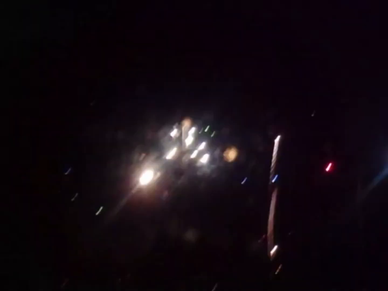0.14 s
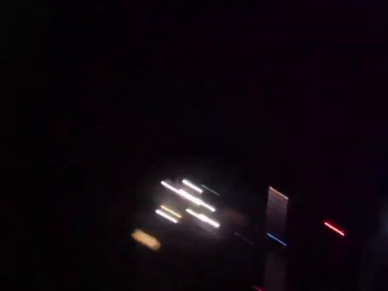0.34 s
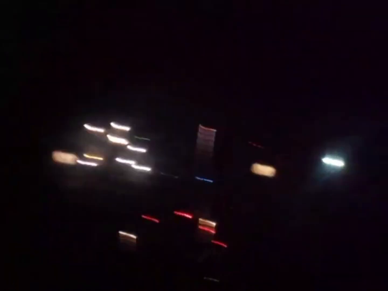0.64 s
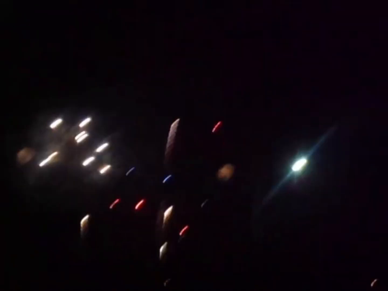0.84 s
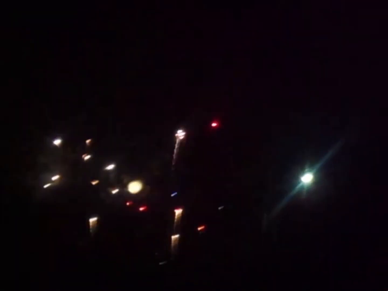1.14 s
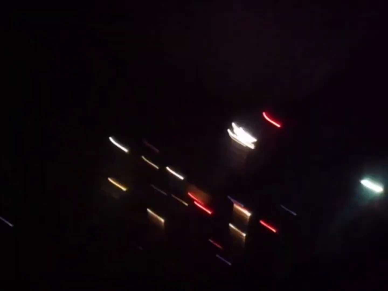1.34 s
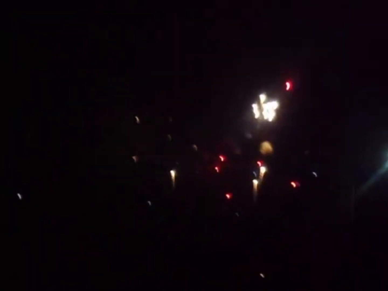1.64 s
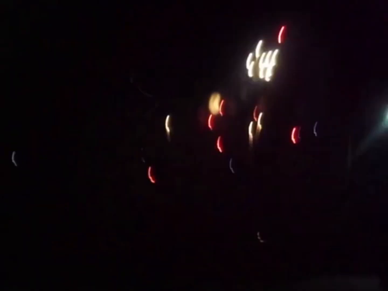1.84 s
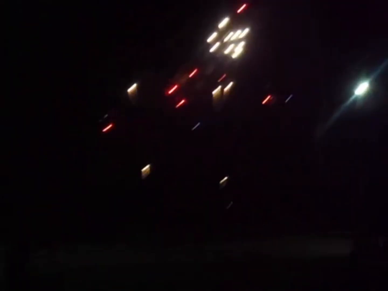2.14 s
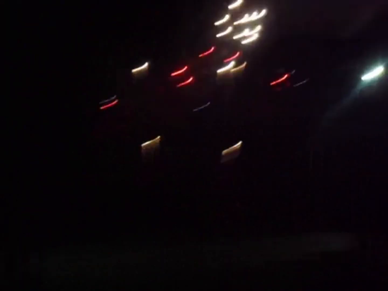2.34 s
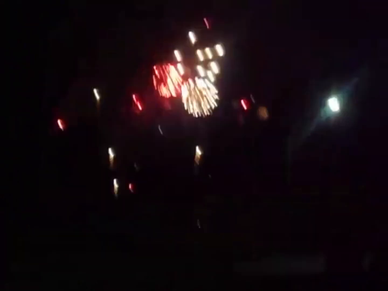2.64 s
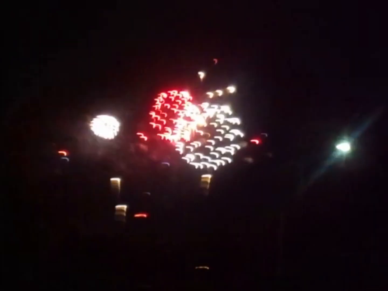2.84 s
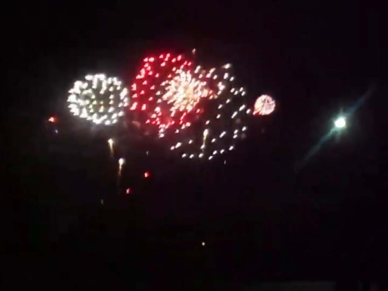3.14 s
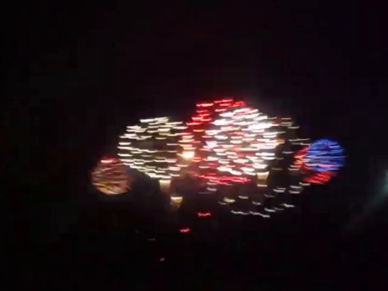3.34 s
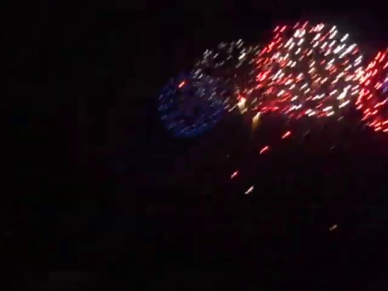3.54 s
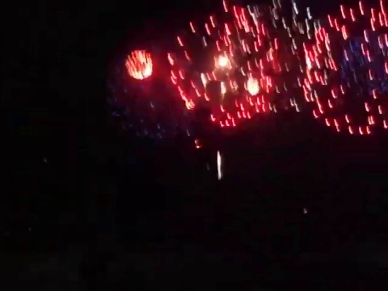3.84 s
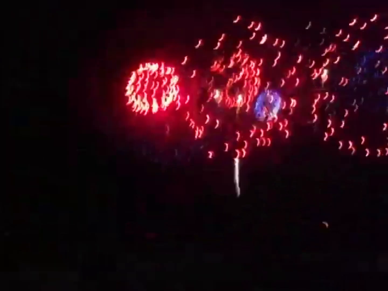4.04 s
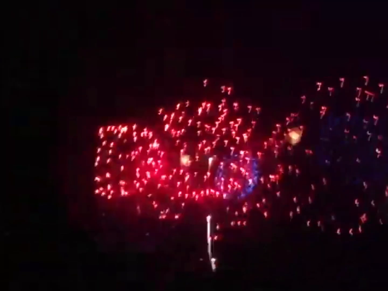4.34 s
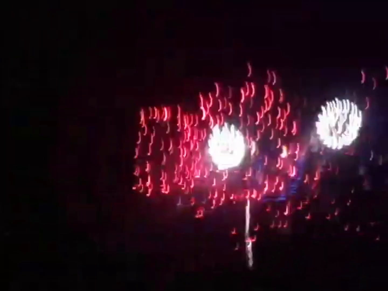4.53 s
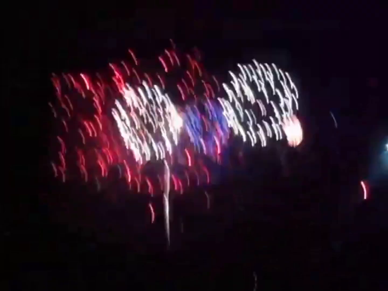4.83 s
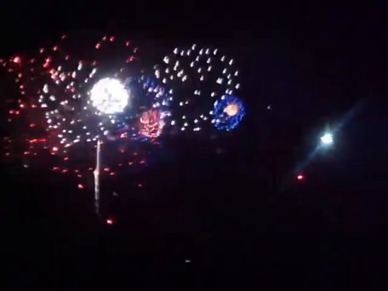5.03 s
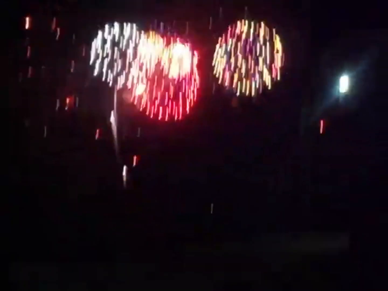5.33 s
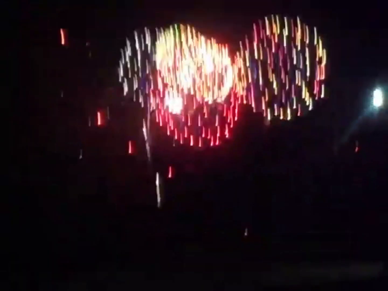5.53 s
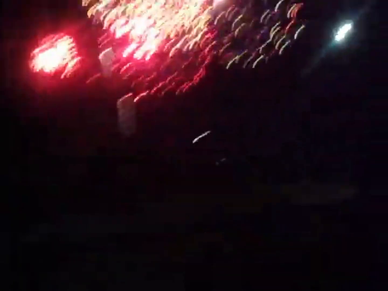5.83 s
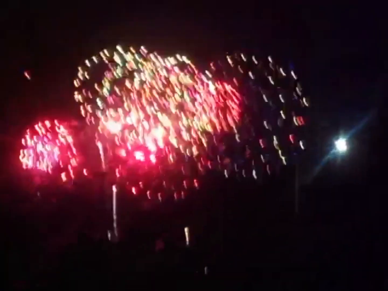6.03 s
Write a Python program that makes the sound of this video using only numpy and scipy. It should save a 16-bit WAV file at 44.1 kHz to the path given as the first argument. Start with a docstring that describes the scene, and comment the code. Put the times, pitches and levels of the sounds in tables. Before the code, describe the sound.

Outdoors, a few sharp firework bangs and scattered little pops open over a soft, far-off rumble. Soon the barrage thickens: louder cracks with deep thumps land at uneven intervals, several a second, their echoes rolling together while light crackling carries on. The bursts keep coming throughout. It is all heard from the ground through a phone that loses the high end and overloads slightly on the hardest bangs.

```python
"""Fireworks over open ground at night, heard through a phone that passes little treble.
From the start, shells burst overhead and small stars pop over the rumble of far-off fireworks.
Each burst is a sharp crack, doubled by the ground, on a low thump of air; echoes roll after it.
From 1.7 s the thumps are heavier and the loudest cracks overload the phone.
The shells keep coming in quick succession, the last at 6 s."""
import sys
import numpy as np
from scipy import signal
from scipy.io import wavfile
from scipy.ndimage import uniform_filter1d

SR = 44100
rng = np.random.default_rng(int(sys.argv[2]) if len(sys.argv) > 2 else 0)


def put_to_file(sound):
    """Save the sound as 16-bit audio at rate SR, in the file named by the first command-line argument."""
    columns = np.atleast_2d(sound).T  # one column per channel
    safe = np.clip(columns, -1, 1)
    whole_steps = np.round(safe * 32767)
    wavfile.write(sys.argv[1], SR, whole_steps.astype(np.int16))


N = 272538

# One row per shell. The bite is a ring above the crack's pitch; the sizzle is the treble on top.
# (time [s], crack level [dB], crack pitch [Hz], bite level [dB], bite pitch [Hz],
#  thump level [dB], thump pitch [Hz], sizzle level [dB]); levels are relative
SHELL_BURSTS = [(0.0721, -6.5, 875, -7, 1105, -25, 154, -24.5),
                (0.2649, -13, 856, -18.5, 1140, -19.5, 268, -23.5),
                (0.5783, -12, 830, -17, 1310, -18.5, 185, -32),
                (0.6366, -6.5, 860, -8, 1104, -15.5, 214, -19),
                (1.1154, -22.5, 1040, -25, 1280, -19, 161, -31),
                (1.2081, -19.5, 730, -13.5, 1260, -16, 204, -23.5),
                (1.6982, -2, 895, -1.5, 1270, -7, 120.4, -11.5),
                (2.0124, -8.5, 600, -10.5, 1120, -7, 122, -26),
                (2.0251, -22.5, 1020, -17, 1510, -10, 126, -44),
                (2.0495, -39, 860, -3.5, 1295, -7.5, 137, -14),
                (2.0996, -13, 603, -17, 1480, -7.5, 131, -21),
                (2.4554, -15, 880, -16, 1180, -16, 205, -32.5),
                (2.542, -5, 920, -10, 1130, -10.5, 136, -13.5),
                (2.5626, -16, 620, -20, 1490, -6.5, 119, -16),
                (2.6274, -7, 920, -12, 1270, -8.5, 123, -16.5),
                (2.9968, -4, 980, -18.5, 1220, -8.5, 129, -18),
                (3.0849, -7.5, 1030, -13.5, 1160, -11.5, 125.5, -18),
                (3.2723, -24.5, 805, -12, 1180, -13, 120.4, -24),
                (3.482, -11.5, 960, -0.5, 1314, -7.5, 120.5, -18),
                (3.6776, -5.5, 862, -10.5, 1350, -5.5, 132.3, -19.5),
                (3.9803, -9.5, 980, -22.5, 1210, -17.5, 185, -27),
                (4.0942, -2, 936, -5.5, 1237, -8.5, 124, -11), (4.4189, -5, 694, -5.5, 1083, -6, 129, -9),
                (4.8188, -1, 747, -5, 1167, -5.5, 118, -18),
                (5.3911, -4.5, 780, -6, 1156, -8.5, 121, -14.5),
                (5.5397, -10.5, 840, -10, 1270, -8.5, 137.5, -16),
                (5.7953, -11, 803, -11.5, 1160, -8, 109, -18.5),
                (5.8302, -13, 853, -15, 1230, -14, 203, -21.5),
                (6.0202, -7.5, 773, -10, 1230, -10, 165.5, -13.5)]
BANDS_HZ = 40 * 2 ** np.arange(0, 6.8, .5)  # half an octave apart
TICK_HZ = 3550  # thin, high ring in both pops and shells


def undb(db):
    """Turn decibels into a factor to multiply a sound by."""
    return 10 ** (np.asarray(db) / 20)


def unit(x):
    """Scale a signal to an average power of 1."""
    return x / np.sqrt(np.mean(x ** 2))


def noise_band(count, hz, width):
    """Noise around one pitch; a larger width spreads it further."""
    edges = [hz / (1 + width / 2), hz * (1 + width / 2)]
    bandpass = signal.butter(2, edges, "band", fs=SR, output="sos")
    return unit(signal.sosfilt(bandpass, rng.standard_normal(count)))


def add(out, start_s, sound):
    """Mix a short sound into out at the given time."""
    i = int(start_s * SR)
    out[i:i + len(sound)] += sound[:max(N - i, 0)]


def look_up(table, hz, column=1):
    """Read a table at any pitch, sliding between its rows."""
    table = np.array(table)
    return np.interp(np.log(hz), np.log(table[:, 0]), table[:, column])


def wander(rate):
    """A curve that glides to a new random value rate times a second."""
    step = int(SR / rate)
    stairs = np.repeat(rng.standard_normal(N // step + 1), step)
    return unit(uniform_filter1d(stairs, step)[:N])


def ring(hz, cycles, count):
    """A tone of peak 1 that starts with a push of air and fades by 60 dB in the given cycles."""
    turn = np.arange(count) / SR * hz
    wave = np.sin(2 * np.pi * turn) * np.exp(-np.log(1000) * turn / cycles)
    return wave / wave.max()


def far_barrage():
    """Distant bursts blur into a rumble whose bands flicker."""
    # Tone of the rumble: (pitch [Hz], relative level per Hz [dB])
    rumble_tone = [(18, -40), (30, -9.5), (174, 3), (337, -8.5), (627, -4), (771, -4), (1270, -3),
                   (2720, -21.5), (3490, -14.5), (4200, -34.5), (5460, -68), (9240, -120)]
    # Loudness of the rumble: (time [s], level [dB])
    rumble_levels = [(0.0, -38), (0.33, -48), (0.65, -46.5), (0.95, -50), (1.26, -48.5), (1.89, -50),
                     (2.2, -41.5), (3.349, -41), (3.99, -43.5), (5.501, -46), (6.18, -41.5)]
    rumble, swell = 0, wander(16)
    for hz in BANDS_HZ:
        db = look_up(rumble_tone, hz) + 10 * np.log10(hz) + 2.0 * swell + 2.0 * wander(25)
        rumble = rumble + undb(db) * noise_band(N, hz, width=0.53)
    times, levels_db = np.transpose(rumble_levels)
    return unit(rumble) * undb(np.interp(np.arange(N) / SR, times, levels_db))


def echoes(early_db=-20, late_db=-37, waver_db=1.5):
    """The surroundings throw each burst back as a quick and a slow fade, broken into separate returns."""
    # Tone of the echoes: (pitch [Hz], relative level per Hz [dB])
    echo_tone = [(18, -36), (30, -4.5), (115, 1), (189, -1), (286, -3), (479, -11.5), (909, -12),
                 (1560, -12), (2450, -24), (3630, -25.5), (4200, -41), (5460, -71), (9240, -120)]
    # Time to fade by 60 dB: (pitch [Hz], early echo [s], late echo [s])
    fade_times = [(60, 0.053, 1.8), (255, 0.028, 0.68), (1000, 0.095, 0.9), (3500, 0.068, 1.41)]
    out, returns = 0, wander(220)
    for hz in BANDS_HZ:
        kicks = np.zeros(N)
        for start_s, _, _, _, _, thump_db, _, _ in SHELL_BURSTS:
            # bass echoes follow the thump in full, higher ones in part
            kick_db = thump_db if hz < 330 else 0.77 * thump_db - 0.5
            add(kicks, start_s + 0.0032, [undb(kick_db) ** 2])
        power = 0
        for db, column in ((early_db, 1), (late_db, 2)):
            kept_per_sample = np.exp(-2 * np.log(1000) / (look_up(fade_times, hz, column) * SR))
            power = power + undb(db) ** 2 * signal.lfilter([1], [1, -kept_per_sample], kicks)
        tone_db = look_up(echo_tone, hz) + 10 * np.log10(hz / 100)
        flicker_db = 3.6 * returns * min(hz / 800, 1) + waver_db * wander(40)
        out = out + np.sqrt(power) * undb(tone_db + flicker_db) * noise_band(N, hz, width=0.39)
    return out


def star_pops(faint_per_s=110, faint_db=-46, spread_db=2.5):
    """Stars, the small pellets in a firework, burst with a short ring and a thin tick on top."""
    # The main pops: (time [s], level [dB], pitch [Hz])
    main_pops = [(0.015, -25, 1490), (0.137, -21, 2120), (0.162, -35.5, 820), (0.192, -19.5, 2080),
                 (0.198, -24, 1970), (0.431, -34.5, 720), (0.452, -22.5, 2050), (0.524, -36, 740),
                 (0.78, -36, 1500), (0.815, -34, 690), (0.537, -35.5, 620), (0.828, -36.5, 650),
                 (0.915, -40.5, 637), (1.378, -32.5, 614), (1.042, -36.5, 656), (1.293, -13.5, 1980),
                 (1.319, -33, 1430), (1.368, -29.5, 830), (1.57, -33.5, 650), (1.805, -33.5, 590),
                 (1.827, -52, 3400), (1.838, -30, 756), (1.897, -31, 2230), (1.91, -26, 870),
                 (1.922, -23.5, 1200), (2.217, -23, 1100), (2.355, -18, 2040), (2.663, -18, 1710),
                 (2.668, -23, 1400), (2.784, -19.5, 1464), (3.206, -26, 2210), (3.231, -23.5, 1640),
                 (3.297, -22, 2300), (3.323, -22, 2100), (3.397, -28, 1500), (3.64, -31.5, 3070),
                 (3.667, -19.5, 2330), (3.803, -27.5, 1220), (3.89, -26, 2080), (3.95, -30, 1300),
                 (4.125, -18.5, 2120), (4.151, -17.5, 2070), (4.335, -17, 3670), (4.341, -21, 3450),
                 (4.351, -36, 3400), (4.372, -21, 1840), (4.532, -29, 750), (4.603, -26, 3520),
                 (4.625, -32, 620), (4.651, -30, 860), (4.765, -24.5, 2030), (4.775, -27, 3300),
                 (4.791, -27, 2080), (4.93, -25, 3320), (5.039, -22, 2340), (5.076, -23, 1480),
                 (5.103, -24, 2070), (5.318, -37, 900), (5.489, -19, 1620), (5.69, -29.5, 600),
                 (5.91, -31, 810), (5.996, -24.5, 634), (6.098, -38, 980), (6.17, -29, 2780)]
    # fainter pops are scattered at random between them
    chance = rng.random((900, 3))
    times = np.cumsum(-np.log(1 - chance[:, 0])) / faint_per_s
    levels_db = faint_db - spread_db * np.log(1 - chance[:, 1])
    pitches_hz = 650 * 4.1 ** chance[:, 2]
    faint_pops = [row for row in zip(times, levels_db, pitches_hz) if row[0] < N / SR]
    out, tick = np.zeros(N), ring(TICK_HZ, cycles=35, count=1024)
    fizz_fade = 0.0252 * np.exp(-np.arange(1024) / SR / 0.0046)
    for start_s, db, hz in list(main_pops) + faint_pops:
        tick_db = db - 3.5 - 11 * np.log2(hz / 700)  # deeper pops carry the stronger tick
        pop = undb(db) * ring(hz, cycles=9.6, count=1024) + undb(tick_db) * tick
        add(out, start_s, pop)
        add(out, start_s + 0.001274, 0.34 * pop)
        # nearby surfaces smear each pop into a brief fizz
        fizz = np.convolve(pop[:128], fizz_fade * rng.standard_normal(len(fizz_fade)))
        add(out, start_s + 0.001985, fizz)
    return out


def thump(t, hz, settle_turns=1.3):
    """A burst pushes the air out; it drops quickly to suction, rebounds more slowly, then is still."""
    turn = t * hz
    skew = .5 * (1 - np.cos(2 * np.pi * turn)) - .45
    fade = np.exp(-.3 * turn - (turn / settle_turns) ** 7)
    return np.cos(2 * np.pi * turn + skew) * fade * np.minimum(t / 0.0017, 1)


def shells(ground_s=0.001232, ground_db=-17, wall_s=0.052, wall_db=-20):
    """Each shell explodes with a sharp bang that bounces off the ground, on top of a low thump."""
    count = 2048
    out, t = np.zeros(N), np.arange(count) / SR
    noise_rise = np.minimum(t / 0.0012, 1)
    bite_rise = 1 - np.exp(-t / 0.00057)
    mic_ring = ring(2472, 17.3, count)  # every sharp bang sets this off at the microphone
    tick = ring(TICK_HZ, 15.0, count)
    for start_s, crack_db, crack_hz, bite_db, bite_hz, thump_db, thump_hz, sizzle_db in SHELL_BURSTS:
        # the fireball is ragged: noise fills in once the first clean wave has passed
        ragged = noise_band(count, 1075, width=0.88) * np.exp(-t / 0.0047) * noise_rise
        hiss = noise_band(count, 3000, width=0.67) * np.exp(-t / 0.0035) * noise_rise
        crack = undb(crack_db) * ring(crack_hz, 9.54, count)
        bite = undb(bite_db) * (1.76 * ring(bite_hz, 12.5, count) * bite_rise + .36 * ragged)
        sizzle = undb(sizzle_db) * (mic_ring + 0.67 * tick + .5 * hiss)
        bang = crack + bite + sizzle
        add(out, start_s, bang + undb(thump_db) * thump(t, thump_hz))
        add(out, start_s + ground_s, undb(ground_db) * bang)
        add(out, start_s + wall_s, undb(wall_db) * sizzle)  # one wall returns only the sizzle
    return out


def scene():
    """Mix all the sources into one channel."""
    return (shells() + star_pops() + echoes() + far_barrage())[None]


def record(dry, stop_hz=5350, ceiling=0.715, top_hz=16500):
    """The phone loses deep bass and most sound above 4 kHz, then clips loud peaks, which adds treble."""
    bass_cut = signal.butter(1, 40, "high", fs=SR, output="sos")
    treble_cut = signal.cheby2(9, 75, stop_hz, fs=SR, output="sos")
    top_cut = signal.ellip(8, .2, 70, top_hz, fs=SR, output="sos")
    narrow = signal.sosfilt(treble_cut, signal.sosfilt(bass_cut, dry))
    rounded = narrow - 0.013 * narrow ** 5  # peaks bend slightly before the hard ceiling
    return signal.sosfilt(top_cut, np.clip(rounded, -ceiling, ceiling))


dry = scene()
out = record(dry)
put_to_file(out)
```